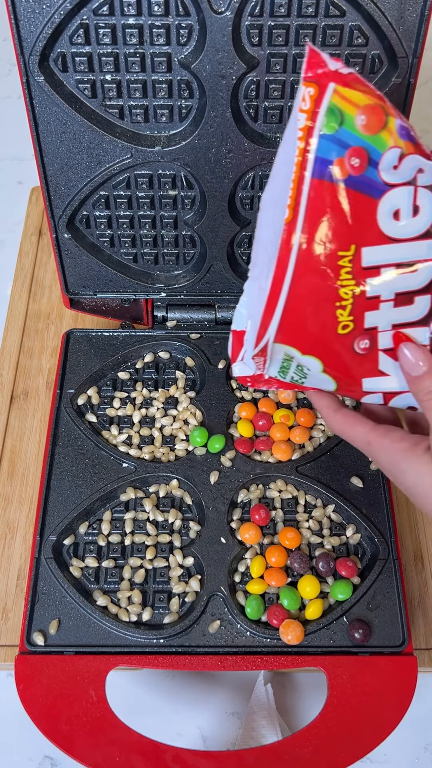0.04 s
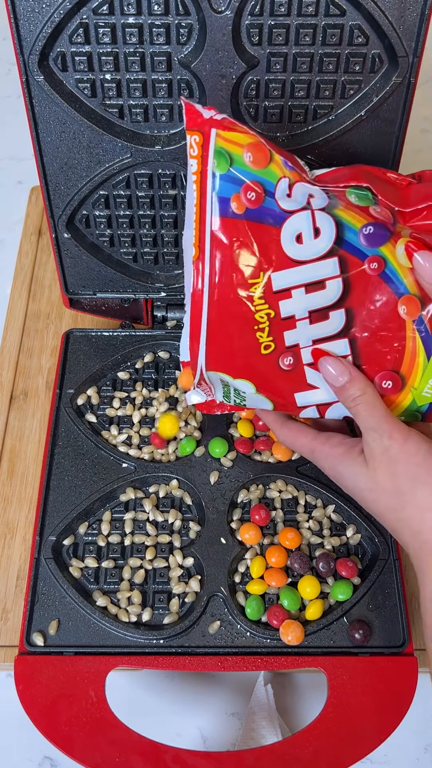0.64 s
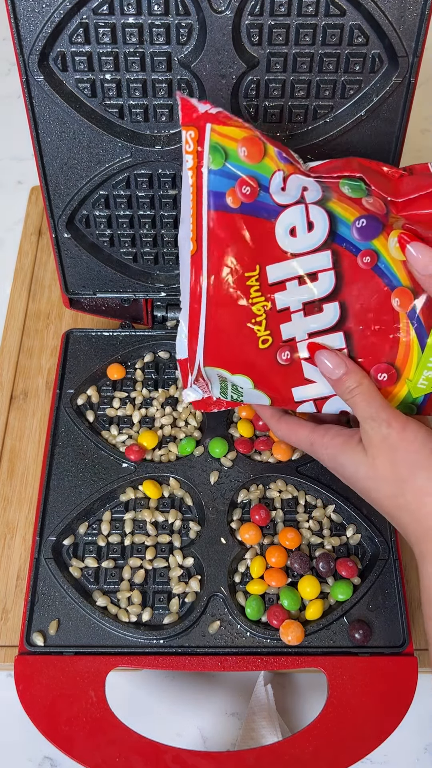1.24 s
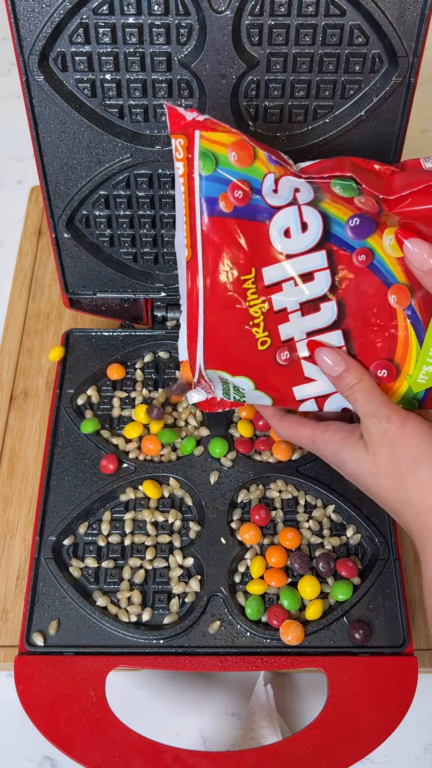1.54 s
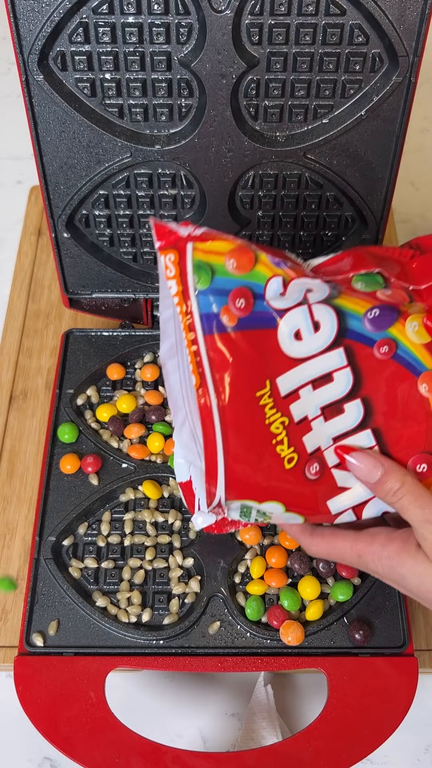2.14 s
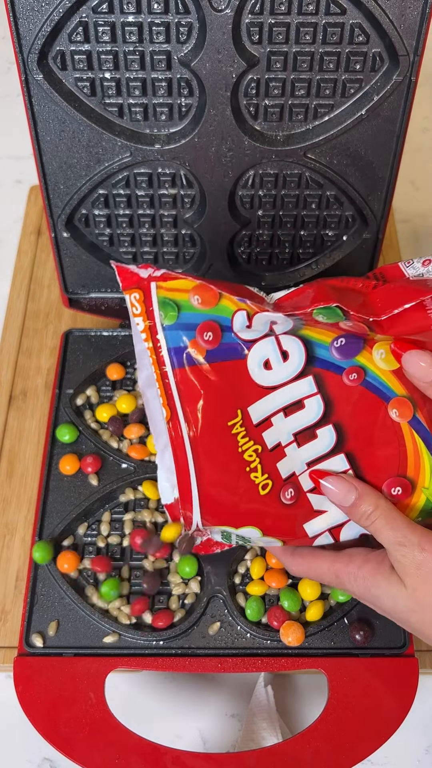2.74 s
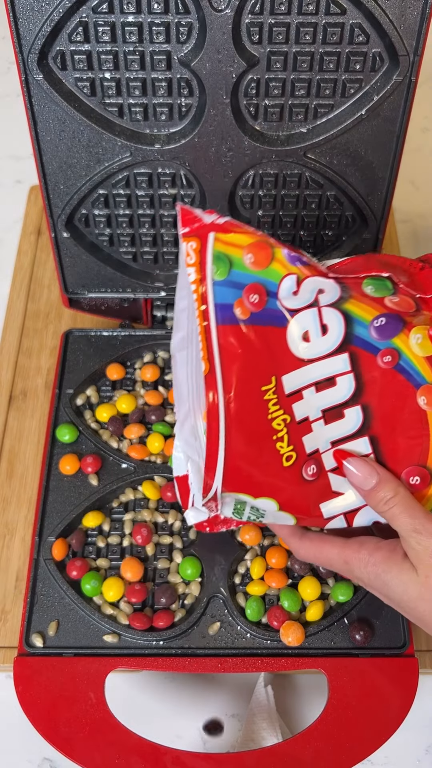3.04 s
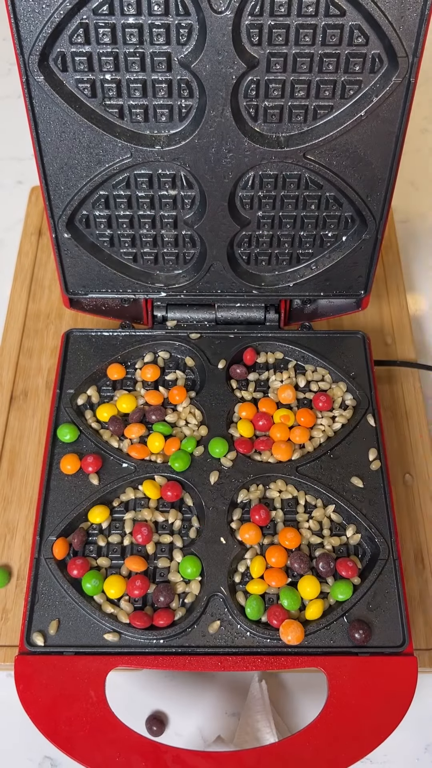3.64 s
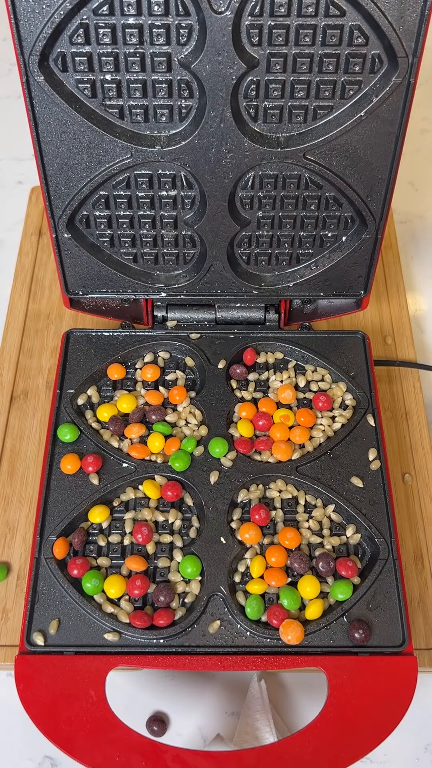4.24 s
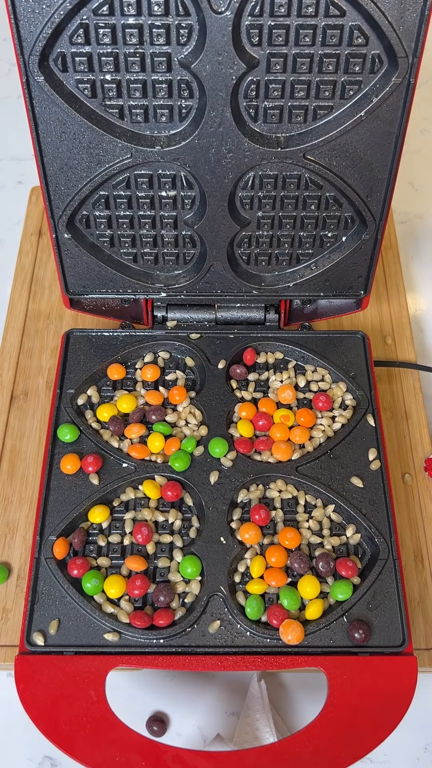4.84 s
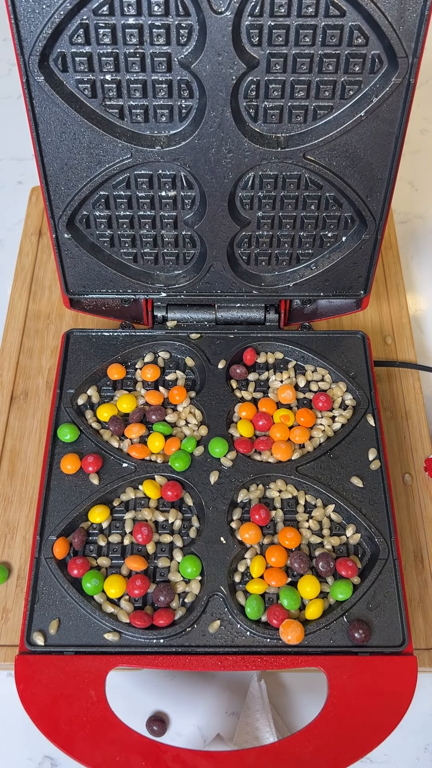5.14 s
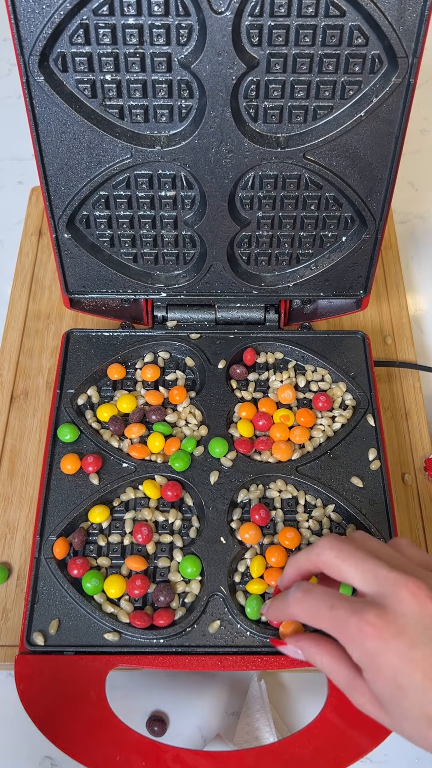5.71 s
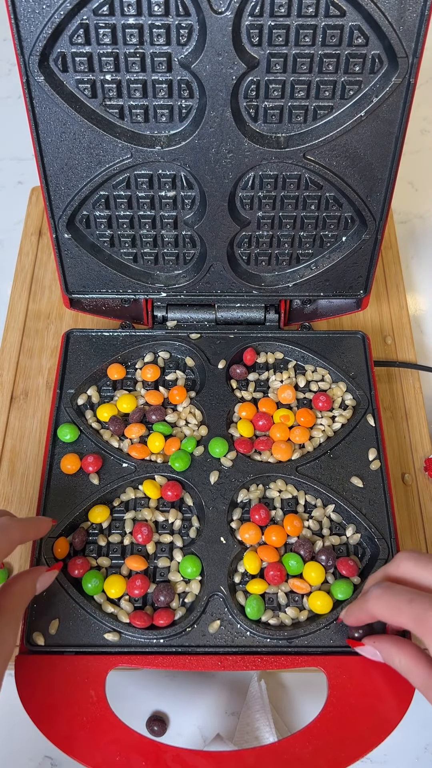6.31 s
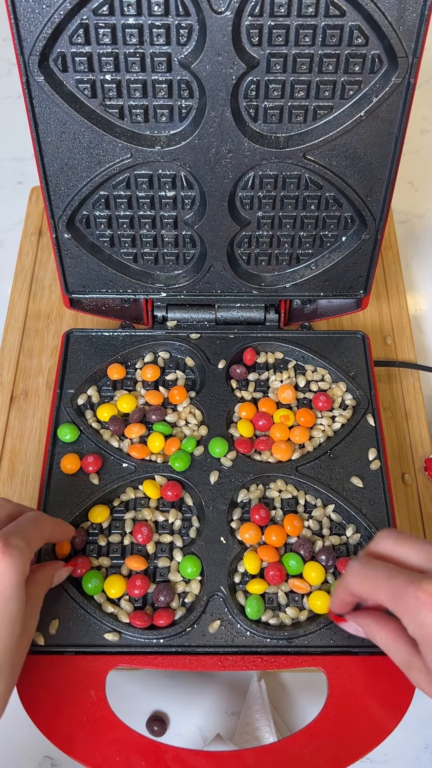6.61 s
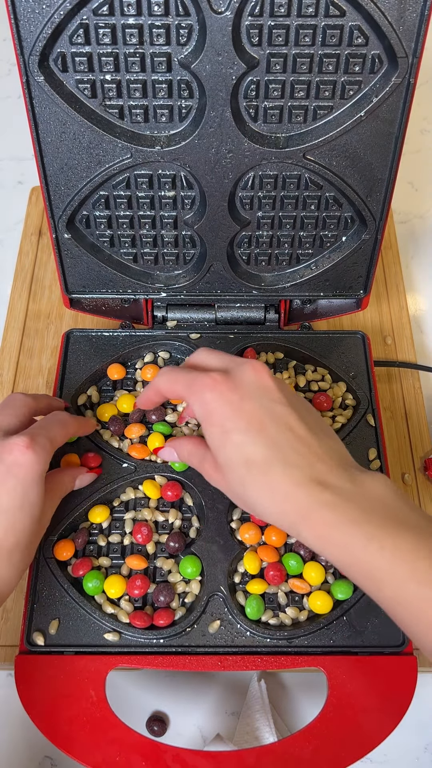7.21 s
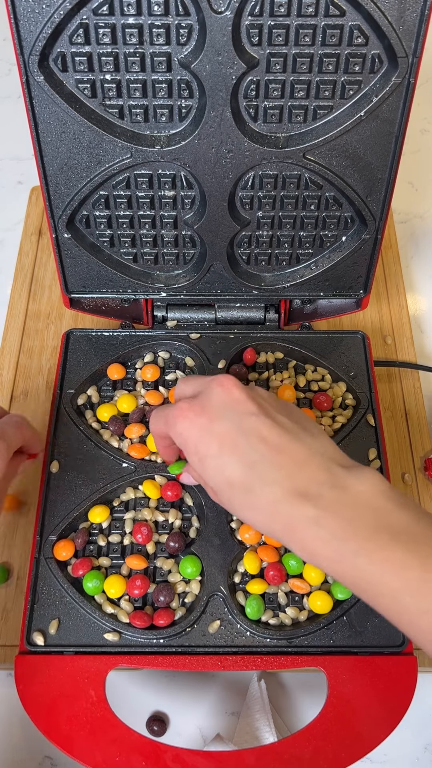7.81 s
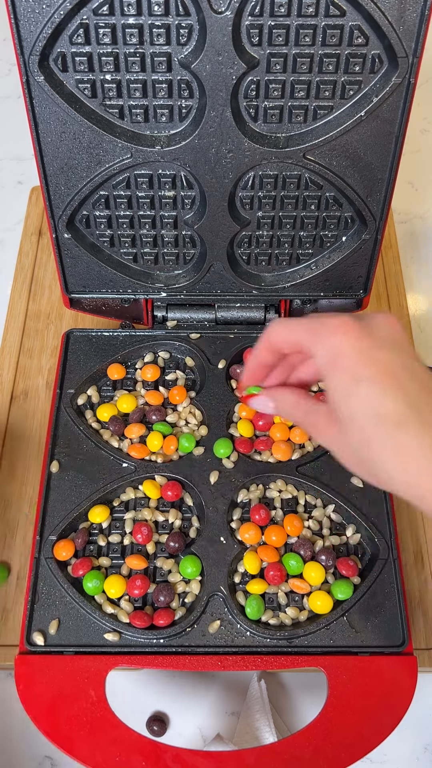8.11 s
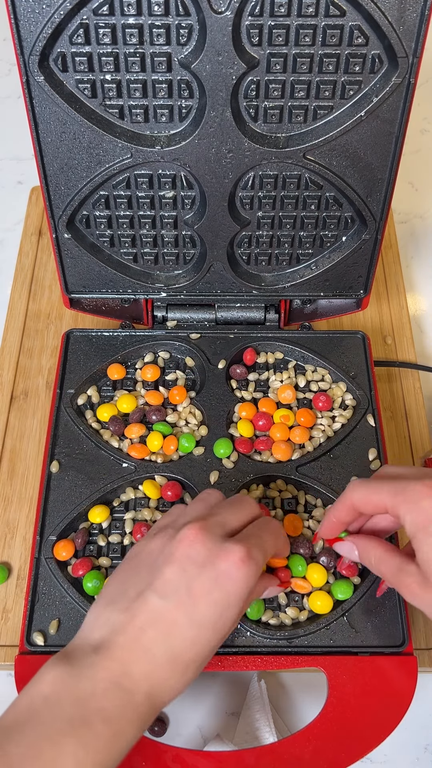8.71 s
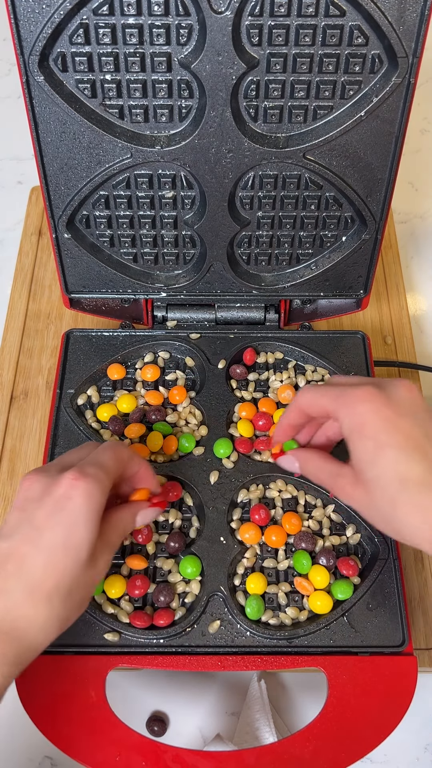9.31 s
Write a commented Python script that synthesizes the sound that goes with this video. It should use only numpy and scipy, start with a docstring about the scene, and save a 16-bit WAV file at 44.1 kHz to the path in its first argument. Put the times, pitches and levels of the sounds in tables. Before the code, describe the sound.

A plastic bag crinkles as small hard candies clatter onto metal plates in short pours, followed by soft clicking as they are rearranged.

```python
"""Candies poured onto a waffle iron.

Hard-shelled candies are shaken from a crinkling plastic bag onto the kernel-filled metal plates of a
waffle iron. Each contact is a short crack of the shell plus the ringing of what it strikes. Some bounce
onto the board and counter, and one rolls. The bag is tipped back and set down, its contents slumping,
and fingers rearrange the candies. An appliance hums in the kitchen."""
import sys
import numpy as np
from scipy import signal
from scipy.fft import rfft, irfft, next_fast_len
from scipy.io import wavfile
from scipy.ndimage import uniform_filter1d

SR = 44100
rng = np.random.default_rng(int(sys.argv[2]) if len(sys.argv) > 2 else 0)


def store_pcm(level_fs):
    """Save levels as 16-bit WAV."""
    pcm = np.round(np.clip(level_fs, -1, 1) * 32767).astype(np.int16)
    wavfile.write(sys.argv[1], SR, np.atleast_2d(pcm).T)


N = 417177
TIME = np.arange(N) / SR
HIT_TIME = TIME[:2048]
PAN = np.array([[.5], [-.5]])   # splits pan_db, left minus right


def from_db(db):
    """Decibels to gain."""
    return 10 ** (np.asarray(db) / 20)


def unit_rms(x):
    """Scale to unit power."""
    return x / np.sqrt(np.mean(x ** 2) + 1e-20)


def decay(t, t60_s):
    """Exponential decay."""
    return np.exp(-np.log(1000) * t / t60_s)


def onset(t, rise_s):
    """Smooth rise from 0 to 1."""
    return 1 - np.exp(-(t / rise_s) ** 2)


def gesture(start_s, length_s, attack_s, release_t60_s):
    """Gain of one movement: attack, hold, release."""
    age = TIME - start_s
    return np.clip(age / attack_s, 0, 1) * decay(np.maximum(age - length_s, 0), release_t60_s)


def random_pitch(low_hz, high_hz):
    """Log-uniform pitch."""
    return low_hz * (high_hz / low_hz) ** rng.random()


def equalise(x, spectrum):
    """Filter by a curve of (freq_hz, gain_db) points."""
    size = next_fast_len(x.shape[-1])
    hz, db = np.transpose(spectrum)
    gains = from_db(np.interp(np.log(np.fft.rfftfreq(size, 1 / SR) + 1), np.log(hz), db))
    return irfft(rfft(x, size) * gains, size)[..., :x.shape[-1]]


# Stereo width: freq_hz, side_over_mid_db
STEREO_WIDTH = [(60, -26.5), (250, -17), (700, 2), (1300, -9.5), (4000, -3.5), (10000, 0)]


def stereo(pair, spectrum):
    """Two unrelated signals as coloured left and right: narrow bass, wide treble, unit power."""
    mid, side = pair[0], equalise(pair[1], STEREO_WIDTH)
    return unit_rms(equalise(np.array([mid + side, mid - side]), spectrum))


def noise(spectrum, size):
    """Coloured stereo noise."""
    return stereo(rng.standard_normal((2, size)), spectrum)


def grains(per_s, spread_db):
    """Random clicks of uneven size and sign; unit power."""
    sizes = from_db(spread_db * np.minimum(rng.exponential(1, N), 4))
    return unit_rms((rng.random(N) < per_s / SR) * sizes * rng.choice([-1, 1], N))


def add(out, start_s, sound):
    """Mix a sound in at a time."""
    start = max(round(start_s * SR), 0)
    out[:, start:start + sound.shape[1]] += sound[:, :N - start]


def contact(spectrum, crack_t60_s, modes=(), ring_db=0, spread_db=0, rise_cycles=0.55, detuning=0.023):
    """The shell's short crack, then the body's modes, struck differently at each spot."""
    t = HIT_TIME
    out = unit_rms(equalise(rng.standard_normal(len(t)), spectrum)) * decay(t, crack_t60_s)
    for hz, db, t60_s in modes:
        strength, detune = rng.standard_normal(2)
        wave = np.sin(2 * np.pi * (hz * (1 + detuning * detune) * t + rng.random()))
        envelope = onset(t, rise_cycles / hz) * decay(t, t60_s)
        out += from_db(db + ring_db + spread_db * strength) * wave * envelope
    return out


def brighten(hit, treble_db):
    """Treble shelf: a harder contact is brighter."""
    dull = signal.lfilter(*signal.butter(1, 3500, fs=SR), hit)
    return dull + from_db(treble_db) * (hit - dull)


def place(hit):
    """A random spot: usually a little later on the left, with one faint reflection per side."""
    phase_per_sample = -2j * np.pi * np.fft.rfftfreq(len(hit))
    lag_samples = 0.99 + 0.78 * rng.standard_normal()
    direct = np.exp(phase_per_sample * np.array([[lag_samples], [0]]))
    reflected = from_db(-13) * np.exp(phase_per_sample * rng.uniform(.0002, .0012, (2, 1)) * SR)
    return irfft(rfft(hit) * (direct + reflected))


def play(rows, sound, neutral_db, hardness, pan_db):
    """Rows of (start_s, level_db, treble_db, *sound_args) to direct and room-bound signal pairs."""
    direct, outward = np.zeros((2, 2, N))
    for start_s, level_db, treble_db, *sound_args in rows:
        # each direction gets its own mix of the modes
        directions = np.array([sound(*sound_args) for _ in range(3)])
        hit, *others = brighten(directions, hardness * (treble_db - neutral_db))
        hit = place(hit)
        power = uniform_filter1d(np.mean(hit ** 2, axis=0), size=88, mode="constant")
        hit = hit / np.sqrt(power.max()) * from_db(level_db + pan_db * PAN)
        add(direct, start_s, hit)
        add(outward, start_s, unit_rms(np.array(others)) * hit.std())
    return np.array([direct, outward])


def patter(gain, sound, per_s, spread_db, count=24):
    """Many small contacts at random times and spots, following a gain curve."""
    spots = [unit_rms(place(sound())) / np.sqrt(len(HIT_TIME)) for _ in range(count)]
    sizes = grains(per_s, spread_db) * gain
    out = np.zeros((2, N))
    for i in np.flatnonzero(np.abs(sizes) > 1e-6):
        add(out, i / SR, sizes[i] * spots[i % count])
    return out


# Room air: freq_hz, gain_db
AIR_SPECTRUM = [(25, -17), (55, -3), (85, -11.5), (130, -6), (290, -8), (430, -10.5), (650, -23),
                (10000, -49.5), (16000, -43)]
# Appliance hum: pitch_hz, level_db
HUM_LINES = [(59.2, -57), (118.4, -62.5), (193.8, -65), (290.7, -56)]
# Balance of each hum line: pan_db
HUM_PANS = [0.5, -2.5, -6.5, -6.5]


def background():
    """Soft air noise and the slightly wavering hum of an appliance."""
    out = noise(AIR_SPECTRUM, N) * from_db(-55 - 1.2 * PAN)
    for (hz, db), pan_db in zip(HUM_LINES, HUM_PANS):
        waver = np.cumsum(rng.standard_normal(N)) * np.sqrt(2 * np.pi * 1.3 / SR)
        out += np.sqrt(2) * from_db(db + pan_db * PAN) * np.sin(2 * np.pi * hz * TIME + waver)
    return out


# Cushioned knock: freq_hz, gain_db
KNOCK_SPECTRUM = [(60, -11), (130, 0.5), (400, 0.5), (1100, 0), (3500, -6.5), (7000, -13.5)]


def bag_contact(pitch_hz):
    """A candy knocks against the film, which cushions it and pops at a pitch of its own."""
    return contact(KNOCK_SPECTRUM, 0.018, [(pitch_hz, -3, .02)]) * (1 - np.exp(-HIT_TIME / 0.0006))


# Tips and squeezes of the bag: start_s, length_s, crinkle_db, contents_db
BAG_GESTURES = [(-0.1, 0.016, -43, -46.5), (0.182, 0.032, -53, -50), (0.392, 0.21, -50, -45),
                (1.208, 0.18, -46, -45.5), (2.279, 0.056, -44.5, -42), (3.559, 0.23, -35.5, -43.5),
                (3.794, 0.16, -37.5, -43.5), (4.369, 0.16, -38.5, -44.5)]
# Crinkling film: freq_hz, gain_db
CRINKLE_SPECTRUM = [(1500, -14.5), (3500, -5), (8000, 3.5), (12000, 2), (16000, -2.5)]
# Single knocks in the bag: start_s, level_db, pitch_hz
KNOCKS = [(0.242, -34.5, 1600), (0.425, -37, 1270), (0.568, -33.5, 1070), (1.296, -37, 1860),
          (1.317, -32, 1180), (3.58, -22, 4200), (3.628, -27, 960), (3.667, -25, 1330), (3.705, -23, 960),
          (3.762, -24, 1210), (3.836, -30, 1400), (4.102, -29.5, 1510), (4.179, -23, 920),
          (4.247, -33, 2030), (4.378, -29, 1530)]


def bag():
    """The handled film crinkles in clumps while the candies inside shift and knock."""
    flexing = shifting = 0
    for start_s, length_s, crinkle_db, contents_db in BAG_GESTURES:
        move = gesture(start_s, length_s, attack_s=0.044, release_t60_s=1)
        flexing += from_db(crinkle_db) * move
        shifting += from_db(contents_db) * move
    drift = signal.sosfilt(signal.butter(2, 35, fs=SR, output="sos"), rng.standard_normal(N))
    clumps = from_db(4 * unit_rms(drift))
    crinkle = stereo([grains(per_s=480, spread_db=4) * clumps for _ in range(2)], CRINKLE_SPECTRUM)
    contents = patter(shifting, lambda: bag_contact(random_pitch(660, 3000)), per_s=260, spread_db=5)
    rows = [(s, db, db, hz) for s, db, hz in KNOCKS]
    knocks = play(rows, bag_contact, neutral_db=-34, hardness=0.93, pan_db=-3)
    return flexing * crinkle + from_db(2) * contents + knocks


# Tick: freq_hz, gain_db
TICK_SPECTRUM = [(200, -19), (700, -2.5), (4500, -5), (9000, -1), (13000, 2), (16000, -2)]


def tick_contact():
    """A snap with a faint tail."""
    return contact(TICK_SPECTRUM, 0.0073) + from_db(-13.5) * contact(TICK_SPECTRUM, 0.022)


# Film and shell ticks: start_s, relative_db, body_db
SHARP_TICKS = [(0.422, -20.5, -41.5), (0.692, -14.5, -53), (1.172, -21, -18), (1.903, -6, -29),
               (2.107, -15, -42), (2.374, -6.5, -36), (3.111, -8.5, -34.5), (3.311, -8.5, -27.5),
               (3.979, -8, -35.5), (4.163, -20, -31), (4.435, -13, -10), (4.462, -11, -8),
               (4.847, -18.5, -50), (5.753, -30.5, -40), (5.953, -25, -46), (6.175, -34, -42),
               (6.233, -33, -67), (6.482, -34, -48.5), (6.767, -31, -54), (6.956, -25, -49),
               (7.49, -18.5, -44), (8.025, -13.5, -44), (8.127, -7, -36), (8.264, -13, -37.5),
               (8.398, -15, -40), (8.467, -22, -48)]


def sharp_ticks():
    """Film creases and shells touch; the less body, the brighter the tick."""
    rows = [(s, db, db - body_db) for s, db, body_db in SHARP_TICKS]
    return from_db(-10) * play(rows, tick_contact, neutral_db=22.5, hardness=2, pan_db=0)


# Shell on metal: freq_hz, gain_db
SHELL_SPECTRUM = [(150, -11.5), (400, -3), (1200, -3.5), (3000, -3), (7000, 1.5), (10000, -4), (12500, 0.5),
                  (16000, -14.5)]
# Waffle plate modes: pitch_hz, back_db, front_db, t60_s
PLATE_MODES = [(434, -9, -14.5, 0.065), (531.5, -11, -11, 0.093), (880, -8, -22, 0.029),
               (1147, -1.5, -9.5, 0.03), (1599, -10.5, -10.5, 0.037), (3550, -18, -13, 0.022),
               (6190, 1, -14, 0.022), (7700, -13.5, 4, 0.014), (11480, 2, 10, 0.0046)]


def plate_contact(at_front):
    """A candy rings the back or front mould, adds a clack, and glances off the next ridge."""
    modes = [(hz, front_db if at_front else back_db, t60) for hz, back_db, front_db, t60 in PLATE_MODES]
    clack = (random_pitch(2744, 7480), -3.5, 0.015)
    hit = contact(SHELL_SPECTRUM, 0.009, modes + [clack], ring_db=-18.5, spread_db=5, rise_cycles=0.98)
    hit *= onset(HIT_TIME, 0.0012)
    rebound_s = 0.0019 * rng.uniform(.5, 2)
    return hit + from_db(-10.5) * np.pad(hit, (int(rebound_s * SR), 0))[:len(hit)]


FRONT_FROM_S = 2.3   # the bag moves from the back mould to the front one
# Hardest falls onto the plate: start_s, relative_db
PLATE_FALLS = [(0.595, -13.5), (0.704, -5), (0.747, -5), (0.829, -9.5), (0.849, -7.5), (0.905, -13.5),
               (0.911, -11.5), (0.984, -17.5), (1.395, -10), (1.433, -5.5), (1.454, -8.5), (1.507, -2),
               (1.573, -8), (1.602, -5.5), (1.621, -9.5), (1.64, -3), (1.65, -32), (1.683, -4), (1.718, -5),
               (1.761, -9), (1.819, -8.5), (1.857, -14), (1.91, -14.5), (1.961, -3.5), (2.061, -3.5),
               (2.494, -1.5), (2.556, -6), (2.617, -6.5), (2.623, -9), (2.64, -4), (2.689, -5.5),
               (2.717, -5), (2.731, -3.5), (2.759, -3.5), (2.774, -5), (2.797, -6.5), (2.819, -2),
               (2.847, -7), (2.875, -6.5), (2.886, -4), (2.893, -7.5), (2.981, -8.5), (3.052, -13)]


def plate_falls():
    """Single candies strike the metal grid; stronger hits are brighter."""
    rows = [(s, db, db, s > FRONT_FROM_S) for s, db in PLATE_FALLS]
    return from_db(-7) * play(rows, plate_contact, neutral_db=-25.5, hardness=0.31, pan_db=0.5)


# Pours: start_s, crest_s, relative_db
POUR_SWELLS = [(0.694, 0.937, -34.5), (1.41, 1.71, -27.5), (2.467, 2.936, -22.5)]


def pour_rattle(build_db_per_s=14.5):
    """Pieces jostle on the plate: each pour builds to a crest, then settles."""
    jostling = rattle = 0
    for start_s, crest_s, db in POUR_SWELLS:
        build = from_db(db - build_db_per_s * np.maximum(crest_s - TIME, 0))
        jostling += build * gesture(start_s, crest_s - start_s, attack_s=0.028, release_t60_s=0.71)
    for at_front in (False, True):
        gain = jostling * ((TIME > FRONT_FROM_S) == at_front)
        rattle += patter(gain, lambda: plate_contact(at_front), per_s=800, spread_db=5)
    return from_db(-1.8) * rattle


# Shell on the board: freq_hz, gain_db
BOARD_SPECTRUM = [(150, -12.5), (500, -11.5), (1500, 2.5), (8500, -5.5), (16000, -25.5)]
# Board modes: pitch_hz, level_db, t60_s
BOARD_MODES = [(344.5, 5, 0.037), (387, 10, 0.029), (920, 2, 0.031), (1147, 4.5, 0.029), (1683, 2, 0.036),
               (2120, -3.5, 0.048), (2452, -1, 0.05), (2810, -5, 0.026)]


def board_contact(low_db):
    """A duller, longer knock, whose round low notes depend on the spot."""
    modes = [(hz, db + (low_db + 19.5) * (0.7 if hz < 1000 else -0.5), t60)
             for hz, db, t60 in BOARD_MODES]
    hit = contact(BOARD_SPECTRUM, 0.019, modes, ring_db=-6.5, rise_cycles=3.5, detuning=0.008)
    return hit * (1 - np.exp(-HIT_TIME / 0.0004))


# Stray hits: start_s, relative_db, treble_db, low_db
STRAY_HITS = [(1.698, -8, 8.5, -17.5), (2.209, -7, 14, -6.5), (2.946, -11.5, 10.5, -6),
              (3.064, -15.5, 9.5, -8), (3.138, -21, -12, -12), (3.19, -20.5, -1, -11),
              (3.254, -27, -14, -16), (5.433, -32, -31, -19.5), (7.837, -8, 12.5, -19),
              (7.906, -28.5, -5, -18), (7.988, -12, 1.5, -17.5), (8.078, -14.5, 12, -18.5),
              (8.135, -18.5, 3.5, -17.5)]


def stray_candies():
    """Stray candies knock and bounce on the board and counter."""
    return from_db(-5) * play(STRAY_HITS, board_contact, neutral_db=6, hardness=0.75, pan_db=0.5)


# Sliding contents: freq_hz, gain_db
RUSH_SPECTRUM = [(400, -10), (1000, 3.5), (2000, -3.5), (5000, -4), (9500, 1.5), (12500, -2.5),
                 (16000, -16.5)]
# Thud of the contents: freq_hz, gain_db
THUD_SPECTRUM = [(40, -44), (90, 2), (160, -7), (300, 0.5), (600, -14), (1400, -6.5), (5000, -22.5)]
# Slumps: start_s, rush_db, rise_s, t60_s, thud_db
BAG_SLUMPS = [(3.309, -24.5, 0.0013, 0.73, -49), (4.474, -21.5, 0.0025, 0.21, -22.5)]


def bag_slumps():
    """The candies slump together in the bag with a smooth rush and a thud."""
    out = np.zeros((2, N))
    rush, thud = noise(RUSH_SPECTRUM, SR), noise(THUD_SPECTRUM, SR)
    age = TIME[:SR]
    for start_s, rush_db, rise_s, t60_s, thud_db in BAG_SLUMPS:
        envelope = (1 - np.exp(-age / rise_s)) * decay(age, t60_s)
        add(out, start_s, envelope * (from_db(rush_db) * rush + from_db(thud_db) * thud))
    return out


# Rolling shell: freq_hz, gain_db
ROLL_SPECTRUM = [(600, -26), (1500, -3), (2400, 0), (3200, -11), (6500, -11), (10000, -31)]


def rolling_candy():
    """A stray candy rolls along the counter with a faint, grainy whirr."""
    whirr = stereo([grains(per_s=2500, spread_db=3) for _ in range(2)], ROLL_SPECTRUM)
    return from_db(-65) * gesture(start_s=4.93, length_s=0.41, attack_s=0.12, release_t60_s=0.74) * whirr


# Slipping piece: freq_hz, gain_db
SCUFF_SPECTRUM = [(300, -9.5), (1100, -1), (1900, 2.5), (3500, -0.5), (7500, -0.5), (16000, -21)]
# Plate modes under a resting hand: pitch_hz, level_db, t60_s
PRESSED_MODES = [(549.5, 0.5, 0.077), (1150, -5.5, 0.096), (1440, 6, 0.0075)]


def scuff_contact():
    """A pushed piece slips and rings the plate softly, at a varying pitch."""
    return contact(SCUFF_SPECTRUM, 0.014, PRESSED_MODES,
                   ring_db=-8.5, spread_db=1, rise_cycles=0.6, detuning=0.074)


FINGER_ATTACK_S, FINGER_RELEASE_T60_S = 0.02, 0.095
# Finger strokes: start_s, length_s, relative_db
STROKES = [(5.76, 0.15, -44.5), (6.558, 0.23, -59), (6.881, 0.12, -56), (7.136, 1, -58),
           (7.666, 0.099, -44), (8.488, 0.27, -55.5), (8.832, 0.055, -54.5)]


def finger_scuffs():
    """Fingers push through the pieces; a light stroke is duller."""
    effort = sum(from_db(db) * gesture(start_s, length_s, FINGER_ATTACK_S, FINGER_RELEASE_T60_S)
                 for start_s, length_s, db in STROKES)
    scuffs = patter(effort, scuff_contact, per_s=260, spread_db=3)
    return from_db(1.5) * brighten(scuffs, 20 * np.log10(0.38 + effort / from_db(-44)))


def nudge_contact(ring_share_db):
    """A candy drops into the next groove of the hand-damped plate."""
    hit = contact(SHELL_SPECTRUM, 0.015, PRESSED_MODES,
                  ring_db=ring_share_db + 6, rise_cycles=1.43, detuning=0.077)
    return hit * onset(HIT_TIME, 0.00093)


# Nudges: start_s, relative_db, ring_db
FINGER_NUDGES = [(5.784, -14, -49), (5.818, -12, -32.5), (5.928, -20, -51), (6.305, -19.5, -49),
                 (6.672, -25, -49), (6.742, -26.5, -34), (6.896, -12, -30.5), (6.932, -16, -63),
                 (7.29, -24, -49.5), (7.658, -12.5, -41), (7.685, -9.5, -49), (7.733, -13.5, -46),
                 (8.688, -31, -47), (8.936, -28.5, -47.5), (9.333, -43, -49)]


def finger_nudges():
    """A fingertip pushes single candies over the ridges of the plate."""
    rows = [(s, db, db, ring_db - db) for s, db, ring_db in FINGER_NUDGES]
    return from_db(-12) * play(rows, nudge_contact, neutral_db=-16.5, hardness=0.74, pan_db=-0.3)


def nail_ticks(start_s=6.1, length_s=3.1):
    """Fingernails tick faintly as the hand moves over the pieces."""
    settling = gesture(start_s, length_s, FINGER_ATTACK_S, FINGER_RELEASE_T60_S)
    return patter(from_db(-67) * settling, tick_contact, per_s=22, spread_db=3)


# Kitchen reflections: freq_hz, gain_db
ROOM_SPECTRUM = [(100, -7.5), (400, 3.5), (1200, 2), (3000, 3), (8000, -5.5), (16000, -13.5)]


def kitchen(outward, near_db, near_t60_s, tail_t60_s=0.64):
    """Quick reflections off lid and counter, then a diffuse tail; each direction has its own paths."""
    t = TIME[:SR // 2]
    envelope = (from_db(near_db) * decay(t, near_t60_s) + decay(t, tail_t60_s)) * onset(t, 0.00059)
    out = 0
    for direction in outward:
        response = unit_rms(noise(ROOM_SPECTRUM, len(t)) * envelope) / np.sqrt(2 * len(t))
        out += signal.oaconvolve(direction[None], response, axes=1)[:, :N]
    return out


def lean_right(x, band_hz=(280, 660), pan_db=-6):
    """Pan the low notes alone."""
    low = signal.sosfilt(signal.butter(1, band_hz, "band", fs=SR, output="sos"), x)
    return x + low * (from_db(pan_db * PAN) - 1)


def scene():
    """Sounds over the plate reflect off the raised lid; knocks on the board beside it are drier."""
    rustle = bag() + bag_slumps()
    ticks = sharp_ticks()
    plate = plate_falls() + pour_rattle() + finger_scuffs() + finger_nudges() + nail_ticks()
    board = stray_candies()
    direct, _ = plate + board + ticks + rustle
    _, outward = from_db(-10) * plate + from_db(-6.5) * ticks + from_db(-7) * rustle
    _, board_outward = from_db(-12) * board
    room = kitchen(outward, near_db=8, near_t60_s=0.085)
    board_room = kitchen(brighten(board_outward, treble_db=4), near_db=3, near_t60_s=0.05)
    return lean_right(direct + room + board_room) + rolling_candy() + background()


def record(dry):
    """High-pass at 42 Hz, soft-clip the peaks, low-pass at 16.2 kHz."""
    rounded = np.tanh(signal.sosfilt(signal.butter(2, 42, "high", fs=SR, output="sos"), dry))
    return signal.sosfilt(signal.ellip(10, .2, 80, 16200, fs=SR, output="sos"), rounded)


dry = scene()
out = record(dry)
store_pcm(out)
```